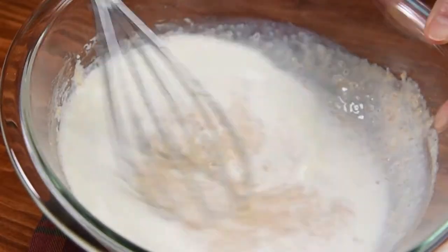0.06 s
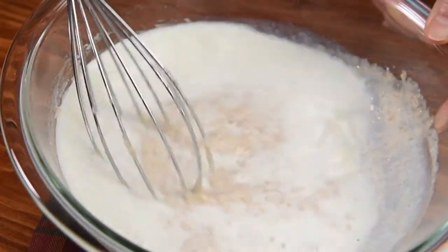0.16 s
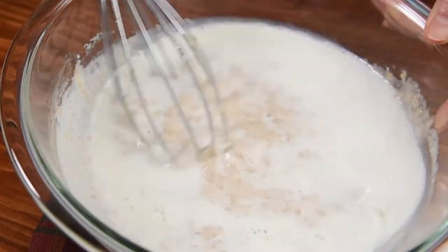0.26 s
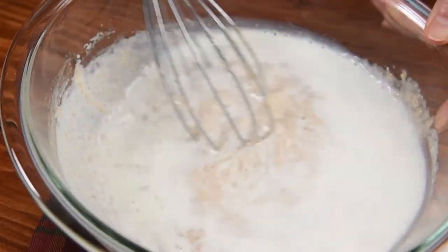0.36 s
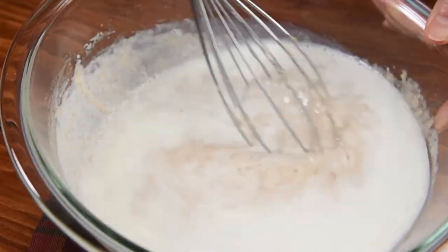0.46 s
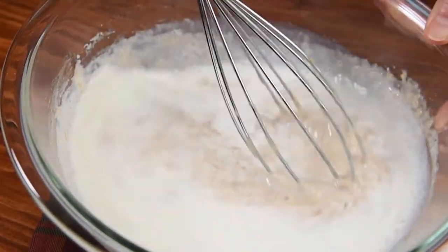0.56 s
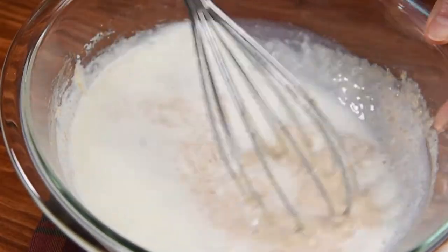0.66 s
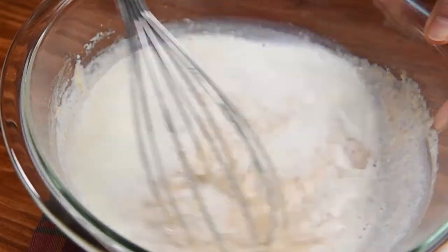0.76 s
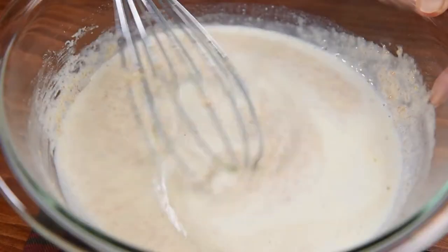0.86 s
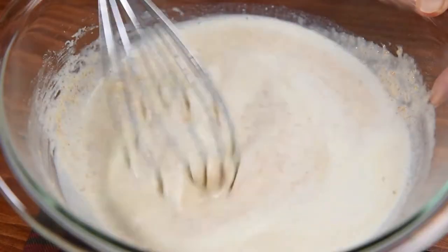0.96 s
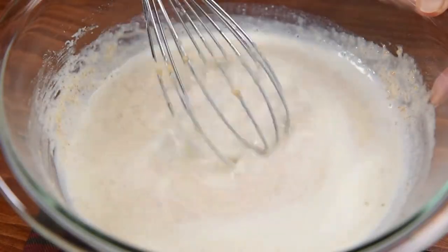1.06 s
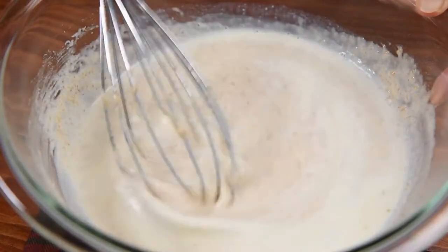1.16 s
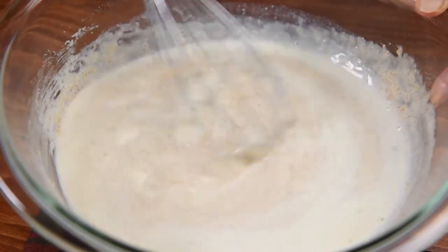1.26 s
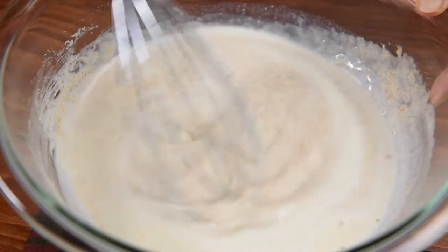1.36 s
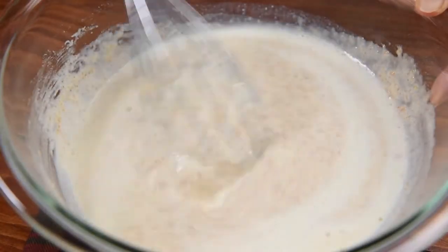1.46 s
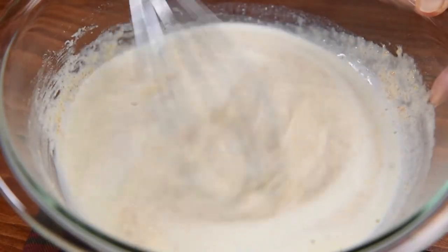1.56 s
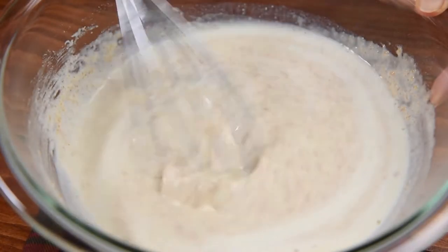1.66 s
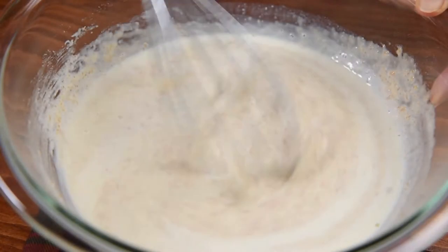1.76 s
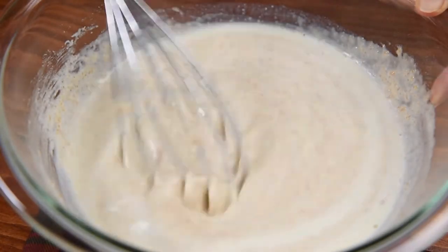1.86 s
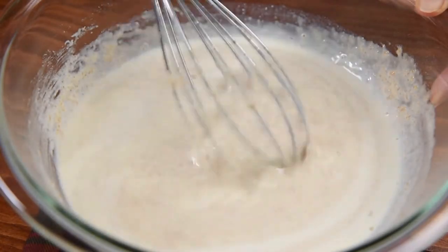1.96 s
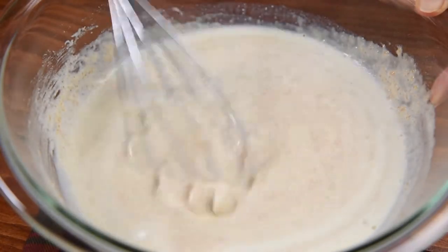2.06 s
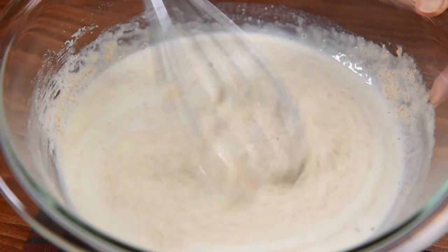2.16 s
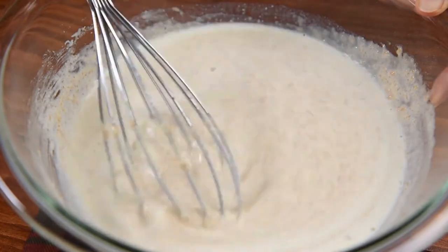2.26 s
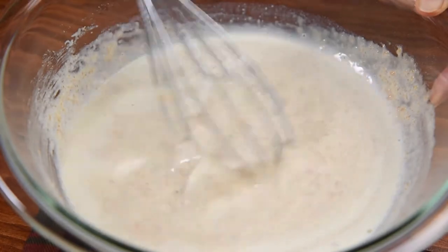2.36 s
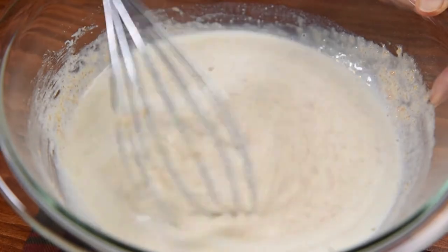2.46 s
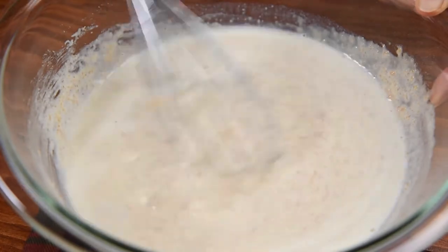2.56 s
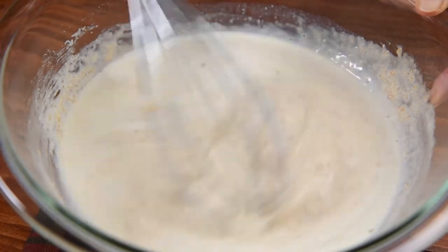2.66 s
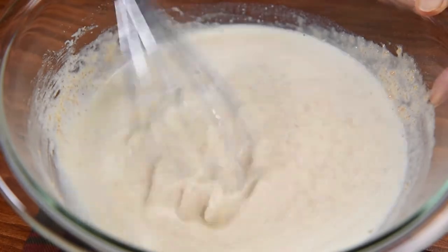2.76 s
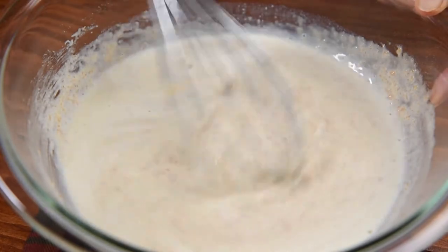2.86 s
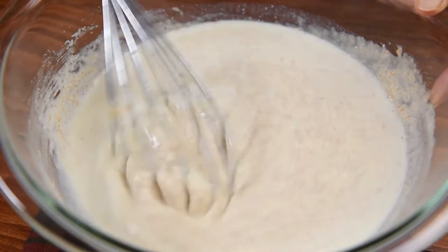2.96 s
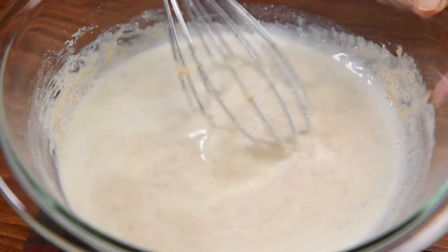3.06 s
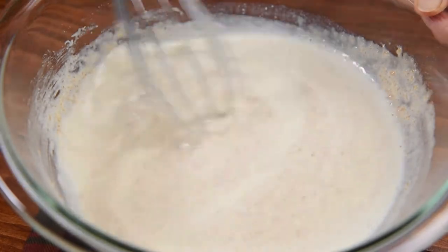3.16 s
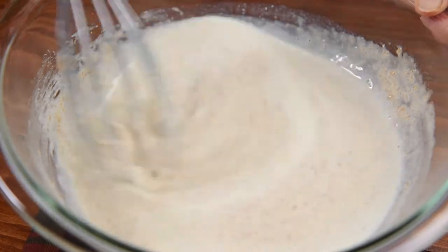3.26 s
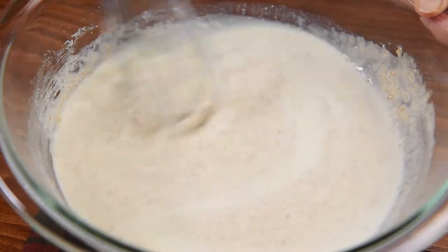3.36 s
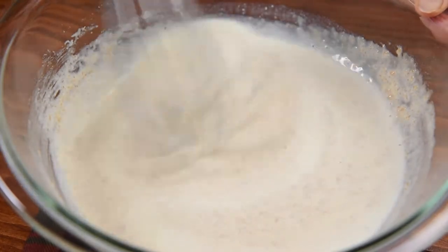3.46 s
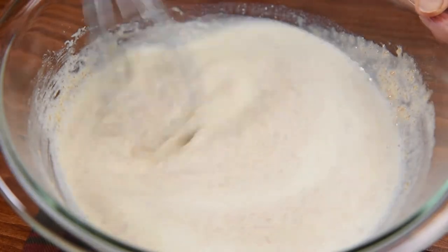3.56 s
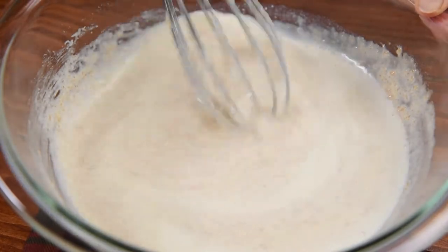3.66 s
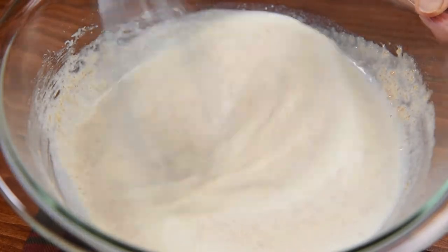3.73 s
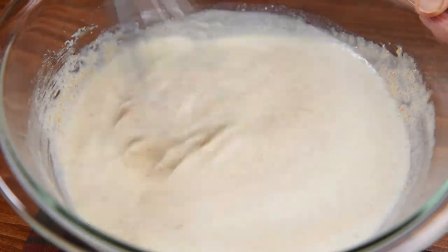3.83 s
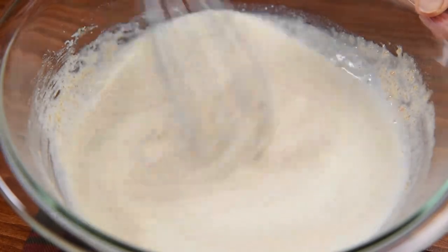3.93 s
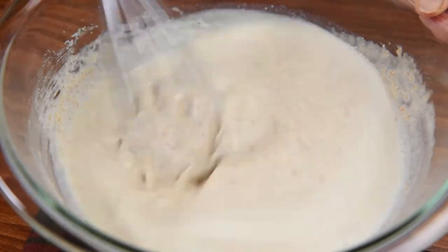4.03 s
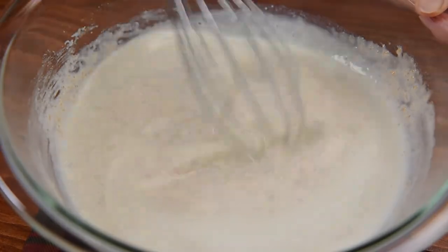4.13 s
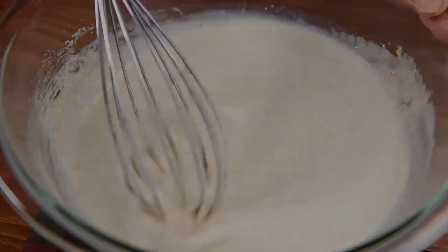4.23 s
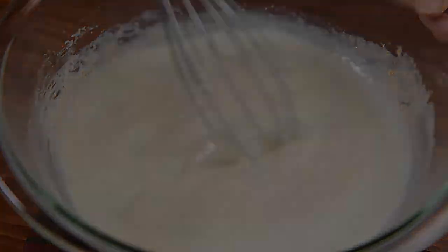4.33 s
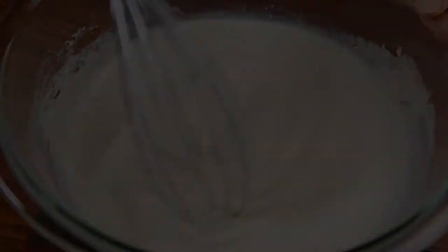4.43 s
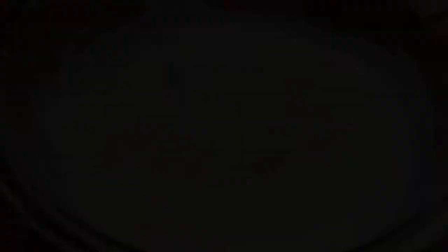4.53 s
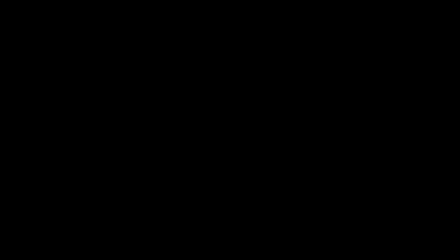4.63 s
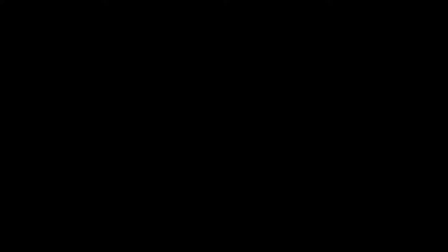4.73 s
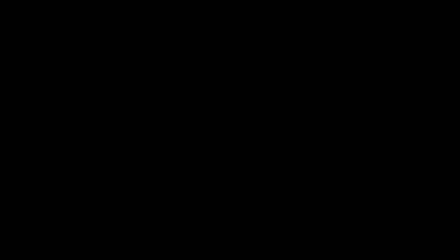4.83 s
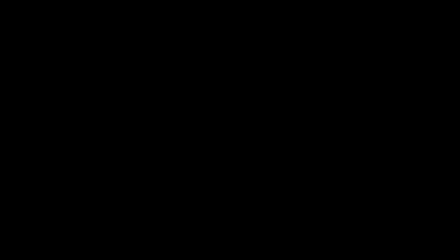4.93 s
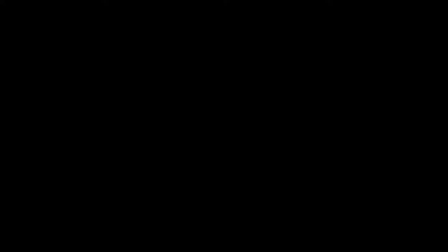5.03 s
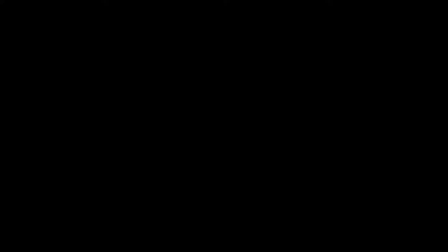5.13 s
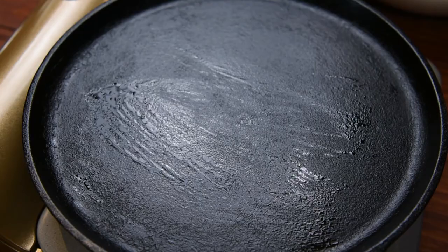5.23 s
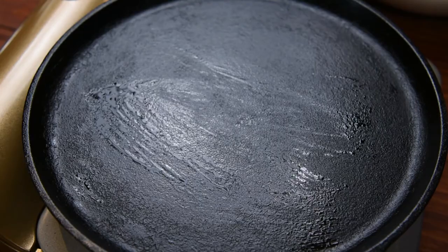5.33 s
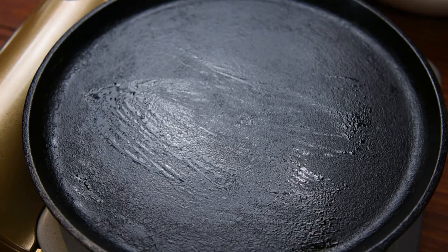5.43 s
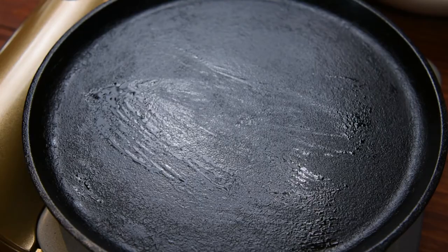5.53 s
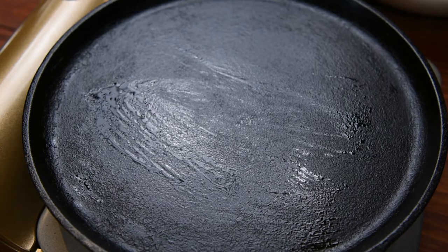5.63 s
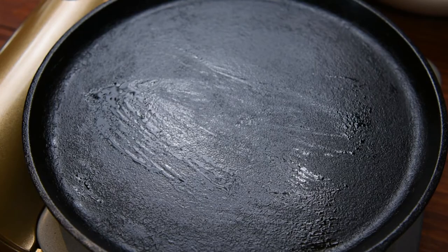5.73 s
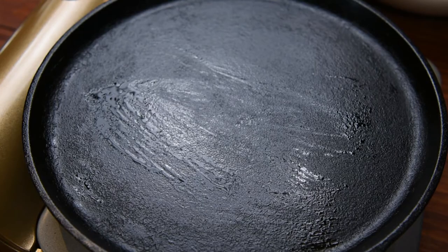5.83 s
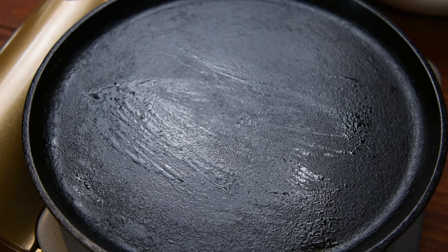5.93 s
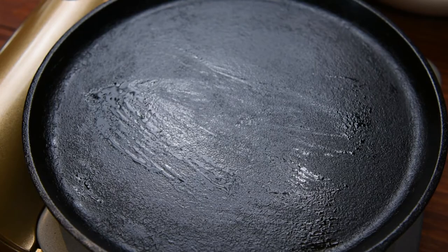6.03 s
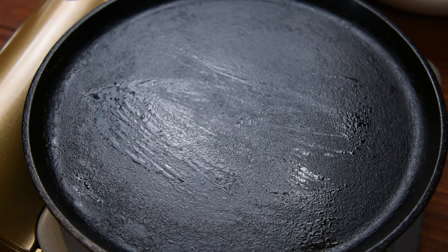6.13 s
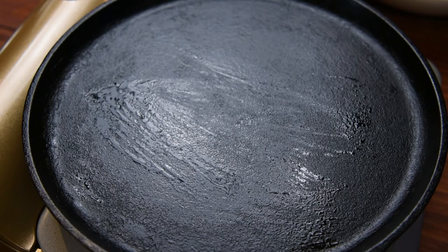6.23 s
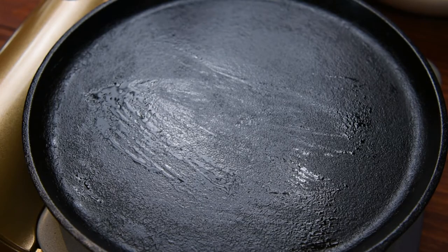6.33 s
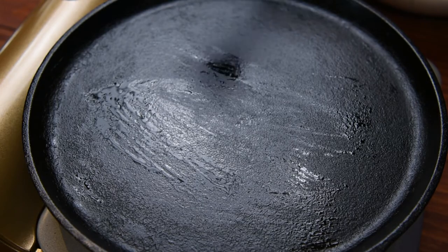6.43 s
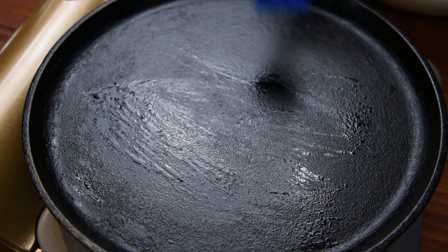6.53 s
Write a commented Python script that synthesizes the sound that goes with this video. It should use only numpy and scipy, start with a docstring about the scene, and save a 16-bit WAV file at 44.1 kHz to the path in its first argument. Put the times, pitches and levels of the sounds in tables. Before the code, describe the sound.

A wire whisk beats thin batter, clacking against a glass bowl with small wet ticks; then a faint hiss of oil brushed over a pan.

```python
"""A wire whisk beats thin batter in a glass bowl, close to a stereo microphone in a small kitchen.
Slow stirring comes first, then about four strokes a second, each a quick roll of wires against the
glass: a bright clack over a low knock that the batter damps. Wet films tick and bubbles plop between.
After a short silence, a pan on the stove: a low hum and the faint hiss of oil being brushed over it."""
import sys
import numpy as np
from scipy import signal
from scipy.fft import rfft, irfft
from scipy.io import wavfile
from scipy.ndimage import uniform_filter1d

SR = 44100
rng = np.random.default_rng(int(sys.argv[2]) if len(sys.argv) > 2 else 0)


def to_wav(sig):
    """Store sig (one row per channel, or 1-D mono) as 16-bit WAV at the path in sys.argv[1].

    Samples outside -1..1 are clipped; the rate is SR.
    """
    pcm = np.clip(np.atleast_2d(sig), -1, 1) * 32767
    pcm = np.round(pcm).astype(np.int16)
    wavfile.write(sys.argv[1], SR, pcm.T)  # frames by channels


N = 290619


def amp(db):
    return 10 ** (np.asarray(db) / 20)


def unit_rms(x):
    return x / np.sqrt(np.mean(x ** 2) + 1e-20)


def decay(t, t60):
    return np.exp(-np.log(1000) * t / max(t60, 1e-3))


def value_at(points, hz):
    """A curve's value at hz, on a log-frequency axis."""
    points_hz, values = np.transpose(points)
    return np.interp(np.log(hz + 1), np.log(points_hz + 1), values)


def add(mix, start_s, sound):
    part = mix[max(round(start_s * SR), 0):][:len(sound)]
    part += sound[:len(part)]


def noise(colour, size):
    """Noise of rms 1 with the given spectrum."""
    hz = np.fft.rfftfreq(size, 1 / SR)
    phases = np.exp(2j * np.pi * rng.random(len(hz)))
    return unit_rms(irfft(amp(value_at(colour, hz)) * phases, size))


def blow(x, db):
    """Scales a blow to the energy of 10 ms at the given level."""
    return x * amp(db) * np.sqrt(SR / 100 / (np.sum(x ** 2) + 1e-20))


def split_bands(x, edges_hz):
    """The parts of x between rising band edges."""
    lowpasses = [signal.butter(5, hz, fs=SR, output="sos") for hz in edges_hz]
    below = [signal.sosfiltfilt(sos, x, padtype=None) for sos in lowpasses]
    return np.diff([np.zeros(len(x)), *below, x], axis=0)


def friction(levels, colour, grain_db):
    """Grainy noise that follows a level curve."""
    times, db = np.transpose(levels)
    envelope = amp(np.interp(np.arange(N) / SR, times, db))
    grain = unit_rms(uniform_filter1d(rng.standard_normal(N), size=90))
    return envelope * unit_rms(noise(colour, N) * amp(grain_db * grain))


def room_tone(colour, level_db):
    """Steady air at the microphone: centred in the bass, wide in the treble."""
    # likeness of left and right: (frequency [Hz], coherence [0..1])
    coherence = [(60, 0.95), (180, 0.91), (550, 0.98), (1650, 0.62), (4970, 0.21), (15000, 0.18)]
    alike = np.clip(value_at(coherence, np.fft.rfftfreq(N, 1 / SR)), 0, 1)
    mid = irfft(rfft(noise(colour, N)) * np.sqrt((1 + alike) / 2), N)
    side = irfft(rfft(noise(colour, N)) * np.sqrt((1 - alike) / 2), N)
    return amp(level_db) * np.array([mid + side, mid - side])


def bowl_air(shift_s=0.716, fade_s=0.13):
    """Room tone at the bowl; its colour shifts near 0.72 s."""
    # air of the first moments: (frequency [Hz], relative density [dB])
    stirring = [(18, -66), (30, -31), (252, -9), (319, -13.5), (355, -7.5), (600, -15), (889, -6.5),
                (1320, -18), (2750, -22.5), (3490, -23.5), (16000, -27)]
    # air from 0.72 s on: (frequency [Hz], relative density [dB])
    beating = [(26, -37.5), (45, -12.5), (101, -10), (178, -4.5), (355, -8.5), (513, -10), (594, 0.5),
               (880, -16), (1050, -16), (1750, -23), (2530, -19), (4800, -21), (5990, -22.5),
               (11100, -23.5), (16000, -25)]
    fade = np.clip((np.arange(N) / SR - shift_s) / fade_s + .5, 0, 1)
    return np.sqrt(1 - fade) * room_tone(stirring, -65.5) + np.sqrt(fade) * room_tone(beating, -64.5)


def drag():
    """The whisk drags through flour and cream with a soft rub."""
    # swell of the rub, the last level held: (time [s], level [dB])
    levels = [(0, -67.5), (.12, -64.5), (.25, -62), (.38, -60), (.46, -63.5), (.55, -70), (.68, -65),
              (.8, -67.5)]
    # its spectrum: (frequency [Hz], relative density [dB])
    colour = [(200, -19), (750, -5), (980, -1), (1350, -10), (1650, -8), (2400, -13.5), (4500, -15),
              (7000, -16), (9000, -18), (16000, -18)]
    return friction(levels, colour, grain_db=2)


def clack(snap_db, rattle_db=2, rattle_t60=0.042, snap_t60=0.0091, place_db=3, rise_s=.0004, reflect=0.5):
    """A wire rings the glass and rattles the cage; the mix of modes varies with the place struck."""
    # upper modes of glass and wires: (frequency [Hz], relative level [dB], t60 [s])
    modes = [(1241, -4, 0.059), (1341, -3, 0.051), (1423, -4.5, 0.058), (2251, -6, 0.045),
             (2585, -5.5, .045), (2690, -5, 0.041), (2850, -10, 0.056), (3095, -2.5, .04), (3370, 0, 0.029),
             (3650, -4.5, 0.031), (4290, 1.5, 0.028), (4483, 1, .028), (4650, -5.5, 0.03),
             (5270, -0.5, 0.024), (5520, -4, 0.023), (6220, -5.5, 0.03), (7270, -0.5, 0.031),
             (7790, -2.5, 0.021), (9200, -12, 0.03), (9880, -0.5, 0.02), (10430, -12.5, 0.014),
             (11100, -18, 0.025), (11940, -3.5, 0.025)]
    # dense rattle of the wire cage: (frequency [Hz], relative density [dB])
    rattle = [(400, -26.5), (1100, -6), (1350, -2.5), (1700, -6.5), (2100, -2.5), (2800, -2.5), (4500, 0),
              (6700, -10), (7500, -6), (8800, -9.5), (10000, -7.5), (12500, -17), (16000, -23)]
    t = np.arange(4096) / SR
    places, shifts, phases = rng.standard_normal((3, len(modes)))
    glass = sum(amp(db + place_db * place) * decay(t, t60) * np.sin(2 * np.pi * (hz * detune * t + phase))
                for (hz, db, t60), place, detune, phase in zip(modes, places, 1 + .011 * shifts, phases))
    cage = noise(rattle, len(t)) * (decay(t, rattle_t60) + amp(snap_db) * decay(t, snap_t60))
    contact = (unit_rms(glass) + amp(rattle_db) * unit_rms(cage)) * (1 - np.exp(-t / rise_s))
    # the blow runs up the wire and returns from the handle, comb-filtering each contact differently
    return_s = rng.uniform(.0005, .0014)
    returned = np.pad(contact, (round(return_s * SR), 0))[:len(t)]
    highpass = signal.butter(3, 1100, "high", fs=SR, output="sos")
    return signal.sosfilt(highpass, contact - reflect * returned)


def knock(hz, thud_db=-12, thud_t60=0.029, rise_s=0.00066, free_hz=800):
    """The bowl's low ring; where more batter loads the glass it sounds lower and dies sooner."""
    # low modes of the filled bowl: (multiple of the pitch, relative level [dB], longest t60 [s])
    modes = [(.22, -24.5, .04), (.31, -26.5, 0.023), (.425, -14.5, 0.059), (.77, -20, 0.042),
             (1, 8.5, 0.043), (1.11, -17.5, 0.068)]
    # dull push of the batter: (frequency [Hz], relative density [dB])
    thud_colour = [(60, -23), (170, -13.5), (330, -6.5), (460, -24), (650, 0.5), (850, 4), (1100, -16.5),
                   (2000, -24.5), (5000, -49.5)]
    t = np.arange(4096) / SR
    freedom = min(hz / free_hz, 1) ** 5
    ring = sum(amp(db) * decay(t, t60 * freedom) * np.sin(2 * np.pi * k * hz * t) for k, db, t60 in modes)
    thud = noise(thud_colour, len(t)) * decay(t, thud_t60)
    body = (unit_rms(ring) + amp(thud_db) * unit_rms(thud)) * (1 - np.exp(-t / rise_s))
    # a bowl is too small to radiate deep bass, and the batter smothers the top
    return signal.sosfilt(signal.butter(3, [135, 1000], "band", fs=SR, output="sos"), body)


def stroke(wires, bare_wire, gap_s, swell_db, knock_db, knock_hz, clack_db, tilt_db, loop_hz):
    """The wires land one after another, evenly spaced: a low knock and a bright clack each."""
    # balance of a clean clack: (band centre [Hz], relative level [dB])
    balance = [(1400, -9.6), (2500, -3.5), (4700, 0), (9500, -5.5)]
    # borders of those bands: (frequency [Hz])
    edges_hz = [1800, 3400, 6500]
    centre_hz, balance_db = np.transpose(balance)
    octaves = np.log2(centre_hz / centre_hz[0])
    weight_db = 1.5  # each later wire carries more of the hand's weight into the knock
    knocks, clacks = np.zeros((2, 6000))
    for k in range(wires):
        # batter cushions all wires but one: softer and duller
        snap_db, cushion_db, dulling_db = (10, 0, 0) if k + 1 == bare_wire else (6.5, -3, -1.6)
        band_db = balance_db + (tilt_db + dulling_db) * octaves
        bands = split_bands(clack(snap_db), edges_hz)
        wire = sum(blow(band, db) for band, db in zip(bands, band_db))
        add(clacks, k * gap_s, blow(wire, k * swell_db + cushion_db))
        hz = knock_hz * (1 + .025 * rng.uniform(-1, 1))
        add(knocks, k * gap_s, blow(knock(hz), k * (swell_db + weight_db)))
    # the struck loops ring at a pitch of their own
    loops = amp(-2) * signal.lfilter(*signal.iirpeak(loop_hz, Q=6, fs=SR), clacks)
    return blow(knocks, knock_db) + blow(clacks + loops, clack_db)


def whisk():
    """Stroke after stroke, the wire cage rolls against the glass."""
    # strokes: (time [s], wires landing, which one meets bare glass, gap [s], swell [dB per wire],
    # knock level [dB], knock pitch [Hz], clack level [dB], clack tilt [dB per octave], loop pitch [Hz])
    strokes = [(0.1695, 1, 1, 0.0, 0, -41, 713, -58, -8, 2000),
               (0.6895, 1, 1, 0.0, 0, -53.5, 735, -62, -7, 2000),
               (0.7642, 1, 1, 0.0, 0, -45.3, 732, -58.5, -9, 2000),
               (0.9525, 3, 1, 0.0049, -2, -38.5, 774, -48.5, -8.5, 2720),
               (1.1638, 3, 1, 0.0051, -2, -31, 834, -29, -0.2, 4410),
               (1.3995, 2, 1, 0.0026, -2, -33, 849, -28.5, 0.9, 5010),
               (1.6099, 3, 1, 0.0051, -1, -32, 852, -26, 1.2, 2720),
               (1.8288, 2, 2, 0.0071, 1.5, -31, 822, -31.7, 0, 4410),
               (2.0531, 2, 1, 0.0047, 0, -29.6, 814, -33, -1.5, 2390),
               (2.2629, 2, 2, 0.0043, 4.5, -35.8, 844, -33, -0.5, 2720),
               (2.32, 1, 1, 0.0, 0, -45, 806, -46.5, -4.5, 2390),
               (2.5122, 3, 2, 0.0038, 2, -32.5, 810, -34.5, -1, 2330),
               (2.749, 2, 1, 0.0048, 1, -30, 800, -29.5, 2.1, 2650),
               (2.9634, 3, 1, 0.0055, -4, -36, 798, -41, -10.5, 2720),
               (3.3058, 3, 2, 0.0027, 0, -40.5, 815, -33, 0.8, 4190),
               (3.5543, 3, 2, 0.0035, -1, -34.5, 812, -39, -4.5, 4880),
               (3.8125, 2, 1, 0.0072, -5, -34, 810, -29.7, 2.6, 7720),
               (3.8904, 1, 1, 0.0, 0, -56, 850, -52.5, 0.0, 4300),
               (4.0382, 3, 2, 0.0059, -3, -37.0, 794, -33.5, -2.0, 4080),
               (4.085, 1, 1, 0.0, 0, -56, 880, -56, 0, 3780),
               (4.2792, 2, 1, 0.0082, -1, -36, 822, -33, -0.3, 3330),
               (4.511, 2, 2, 0.0062, 8.5, -38.5, 880, -33, 1.5, 3420),
               (4.7273, 1, 1, 0.0, 0, -45, 922, -48, -7, 2720),
               (4.77, 2, 1, 0.0119, -4, -54.8, 830, -64.2, -9.1, 8770),
               (4.971, 1, 1, 0.0, -3, -50, 884, -51, -6.7, 3420),
               (5.002, 1, 1, 0.0, 1, -54.5, 854, -56, -8, 2330)]
    out = np.zeros(N)
    for start_s, *settings in strokes:
        add(out, start_s, stroke(*settings))
    return out


def clink(start_s=.2718, gain_db=-38.5):
    """A bare wire touches the dry rim once."""
    # modes of the thin ring: (frequency [Hz], relative level [dB], t60 [s])
    modes = [(4070, -14.5, 0.033), (6040, -6, 0.033), (7700, -6, 0.013), (8380, 1, 0.034),
             (10160, -15, .025), (10980, -25, .025), (13800, -15, .025), (15200, -15, .02)]
    out, t = np.zeros(N), np.arange(6000) / SR
    ring = sum(amp(db) * decay(t, t60) * np.sin(2 * np.pi * hz * t) for hz, db, t60 in modes)
    add(out, start_s, amp(gain_db) * ring)
    return out


def pop(peak_db, hz, t60, spray_gain=0.88, glide=.06):
    """A film or bubble of batter snaps: a short rising ring with a little spray."""
    t = np.arange(2048) / SR
    ring = np.sin(2 * np.pi * hz * t * (1 + glide * np.minimum(t / t60, 1)))
    spray = noise([(hz / 6, -14), (hz / 2, -5), (hz, 0), (hz * 2, -12), (hz * 4, -30)], len(t))
    burst = (ring + spray_gain * spray) * decay(t, t60) * (1 - np.exp(-t / 0.00024))
    return amp(peak_db) * burst / abs(burst).max()


def batter(tick_trim_db=-0.5, ring_cycles=45.4, spread_db=4):
    """Films and bubbles burst: clear ticks, rounder plops and spells of fine wet crackle."""
    # snapping films: (time [s], peak before the trim [dB], pitch [Hz])
    ticks = [(1.272, -47, 2630), (1.326, -42.5, 1740), (1.3525, -29, 4760), (1.5663, -47, 3750),
             (2.6758, -38, 5740), (2.7128, -39.5, 4910), (3.3837, -43.5, 2560), (3.4865, -47, 3510),
             (3.634, -42, 2150), (3.717, -28, 8150), (3.7348, -28, 6300), (3.8472, -32, 4260),
             (3.9794, -41, 6110), (3.989, -35, 5500), (4.1152, -42, 2316), (4.3922, -39, 5090),
             (4.9916, -42, 2740)]
    # larger bubbles: (time [s], peak [dB], pitch [Hz])
    plops = [(.369, -48, 1100), (3.585, -44, 1440), (3.873, -48, 1150), (3.936, -49, 1640)]
    # spells of crackle: (start [s], end [s], rate [1/s], typical peak [dB])
    crackle = [(0.331, 0.458, 120, -56.5), (1.05, 3.099, 6.5, -59), (3.82, 4.131, 70, -51),
               (4.149, 5.054, 8, -59)]
    out = np.zeros(N)
    for start_s, peak_db, hz in ticks:
        add(out, start_s, pop(peak_db + tick_trim_db, hz, t60=ring_cycles / hz))
    for start_s, peak_db, hz in plops:
        add(out, start_s, pop(peak_db, hz, t60=.036, spray_gain=.6, glide=.1))
    for start_s, end_s, rate, typical_db in crackle:
        span_s = end_s - start_s
        for when, size, pitch in rng.random((64, 3))[:round(rate * span_s)]:
            peak_db = typical_db + spread_db * (2 * size - 1)
            add(out, start_s + when * span_s, pop(peak_db, hz=1400 * 5 ** pitch, t60=.007))
    return out


def plunge(start_s=.69, gain_db=-55, start_hz=270, end_hz=95, fall_s=.018, t60=0.23):
    """The whisk sinks into the batter with a soft falling gulp."""
    out, t = np.zeros(N), np.arange(8000) / SR
    hz = end_hz + (start_hz - end_hz) * np.exp(-t / fall_s)
    add(out, start_s, amp(gain_db) * decay(t, t60) * np.sin(2 * np.pi * np.cumsum(hz) / SR))
    return out


def rumble():
    """A faint, very low rumble while the bowl is worked."""
    # swell of the rumble: (time [s], level [dB])
    levels = [(.6, -100), (.9, -89.5), (1.65, -84.5), (1.73, -73), (2, -82), (2.6, -81), (2.8, -90),
              (5.1, -93)]
    # its spectrum: (frequency [Hz], relative density [dB])
    colour = [(12, -18), (26, 0), (45, -18), (100, -31.5), (400, -77)]
    return friction(levels, colour, grain_db=2.5)


def kitchen(direct, wet_db=-18, first_s=.008, side_db=-17, wall_s=.032, wall_db=-27):
    """Close up, the direct sound leads; a short, quiet echo and one wall's dull return follow."""
    # decay of the room: (frequency [Hz], t60 [s])
    decay_times = [(200, 0.47), (800, 0.17), (2500, 0.18), (5000, 0.18), (10000, 0.18), (16000, 0.16)]
    size = SR // 2
    reflections = rng.standard_normal((2, size)) * (rng.random((2, size)) < .1)
    reflections *= np.arange(size) > first_s * SR
    hz, t, spectra = signal.stft(reflections, SR, nperseg=256)
    fading = np.exp(-np.log(1000) * t / value_at(decay_times, hz)[:, None])
    _, tail = signal.istft(spectra * fading, SR, nperseg=256)
    mid, side = signal.fftconvolve(direct[None], tail / np.linalg.norm(tail[0]), axes=1)[:, :N]
    side *= amp(side_db)
    wall = np.zeros(N)
    add(wall, wall_s, amp(wall_db) * signal.lfilter(*signal.butter(1, 3000, fs=SR), direct))
    return direct + wall + amp(wet_db) * np.array([mid + side, mid - side])


def stove_air():
    """Room tone at the stove."""
    # steady air: (frequency [Hz], relative density [dB])
    colour = [(20, -23), (80, -11.5), (145, -2.5), (235, -5.5), (265, -7.5), (330, -5.5), (420, -8.5),
              (510, -0.5), (620, -6), (1000, -10), (1600, -15.5), (3000, -17.5), (7000, -20.5),
              (16000, -22.5)]
    return room_tone(colour, -64)


def hum(waver_rad=0.23):
    """Low tones at the stove, each wavering a little in phase."""
    # tones of the hum: (frequency [Hz], rms level [dB])
    tones = [(121, -80.5), (161, -79.5), (275, -74)]
    out, t = np.zeros(N), np.arange(N) / SR
    for hz, db in tones:
        drift = noise([(0, 0), (2, 0.5), (8, -30), (50, -120)], N)
        out += amp(db) * unit_rms(np.sin(2 * np.pi * hz * t + waver_rad * drift))
    return out


def whistle(centre_hz=2675, width_hz=70, level_db=-82):
    """A narrow band of air whistles thinly."""
    hz = np.fft.rfftfreq(N, 1 / SR)
    band = 1 / (1 + (2 * (hz - centre_hz) / width_hz) ** 2)
    return amp(level_db) * unit_rms(irfft(rfft(rng.standard_normal(N)) * band, N))


def oil():
    """Oil hisses faintly as the brush spreads it over the pan."""
    # swell of the hiss: (time [s], level [dB])
    levels = [(5.27, -79.5), (5.7, -76.5), (5.9, -70), (6.1, -75), (6.35, -69), (6.59, -71)]
    # its spectrum: (frequency [Hz], relative density [dB])
    colour = [(500, -12), (1200, -1.5), (2800, -1), (5000, -3), (8000, -10), (16000, -12.5)]
    return friction(levels, colour, grain_db=1)


def scene(bowl_until_s=5.102, stove_from_s=5.264):
    """The microphone at the bowl, a short silence, then at the stove."""
    t = np.arange(N) / SR
    bowl = kitchen(whisk() + clink() + batter() + plunge()) + drag() + rumble() + bowl_air()
    stove = stove_air() + hum() + whistle() + oil()
    return bowl * (t < bowl_until_s) + stove * (t > stove_from_s)


def record(dry):
    """A steep low-pass takes off the treble above 16.1 kHz."""
    lowpass = signal.firwin(511, 16100, window=("kaiser", 9), fs=SR)
    return signal.oaconvolve(dry, lowpass[None], "same")


dry = scene()
out = record(dry)
to_wav(out)
```